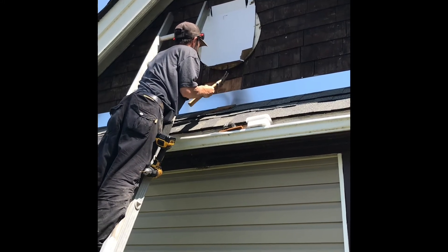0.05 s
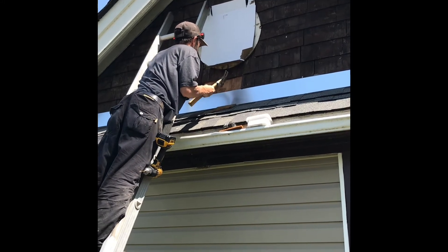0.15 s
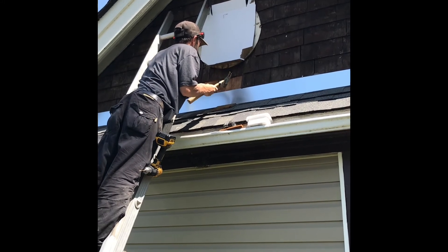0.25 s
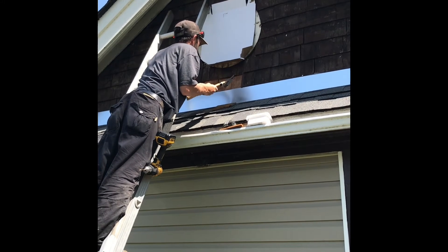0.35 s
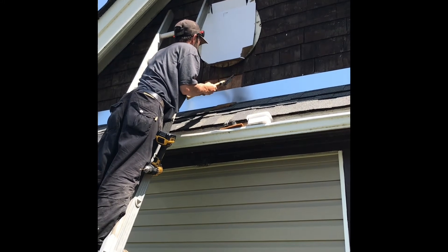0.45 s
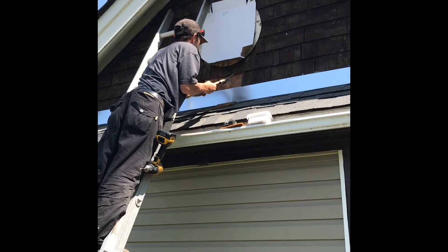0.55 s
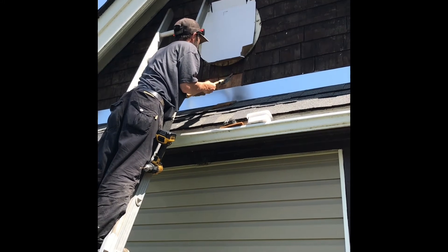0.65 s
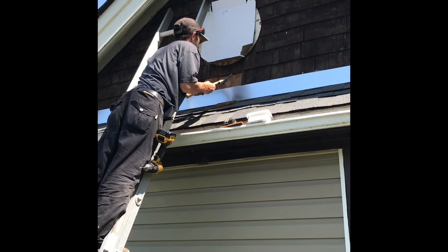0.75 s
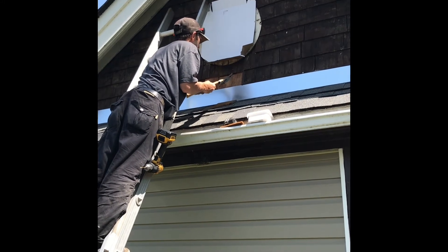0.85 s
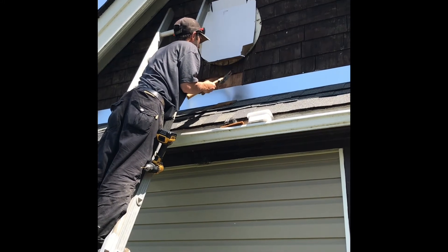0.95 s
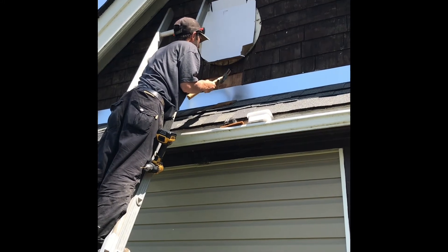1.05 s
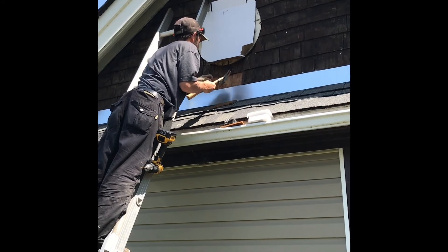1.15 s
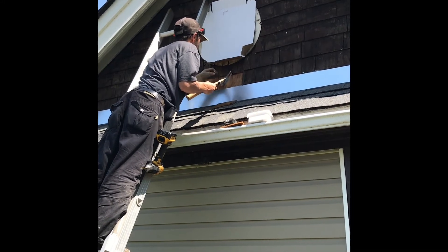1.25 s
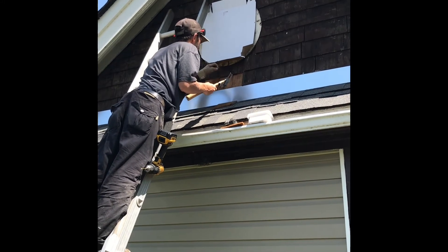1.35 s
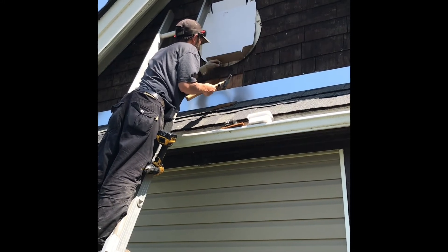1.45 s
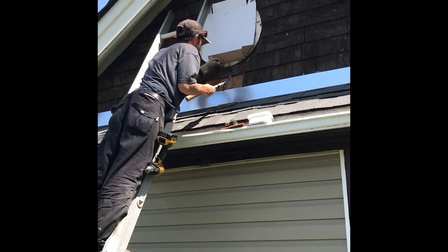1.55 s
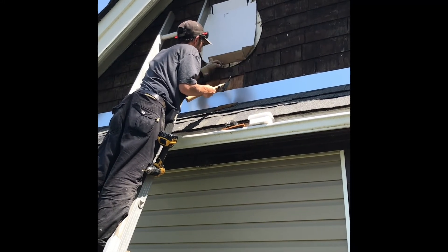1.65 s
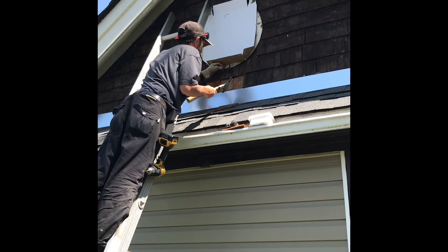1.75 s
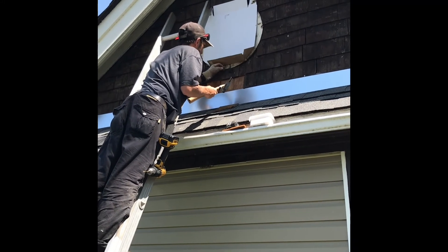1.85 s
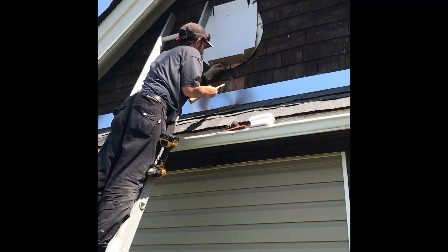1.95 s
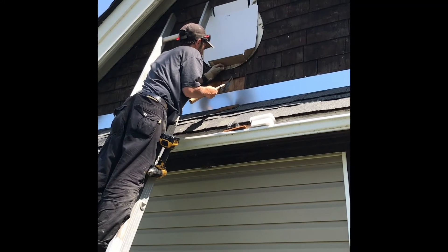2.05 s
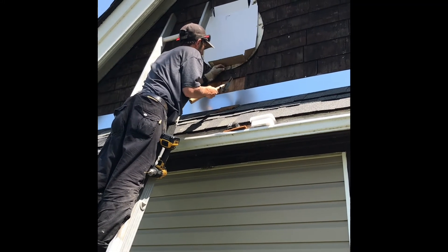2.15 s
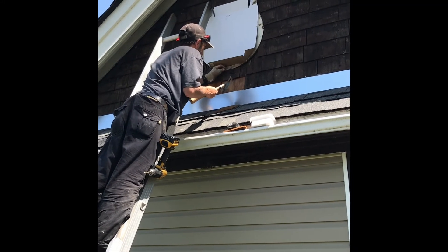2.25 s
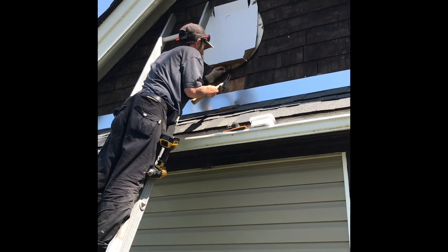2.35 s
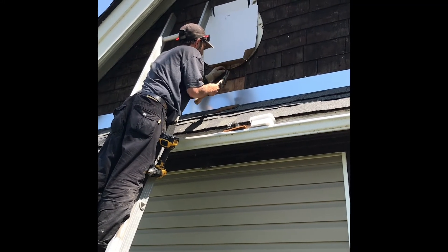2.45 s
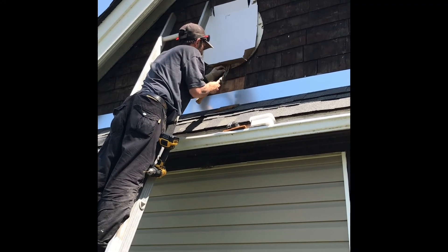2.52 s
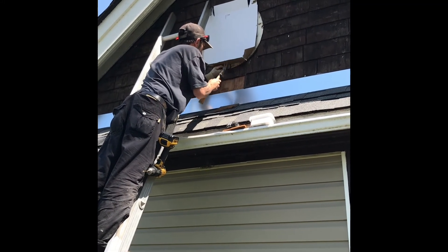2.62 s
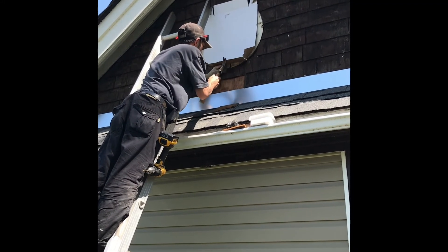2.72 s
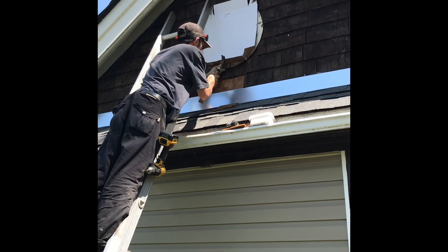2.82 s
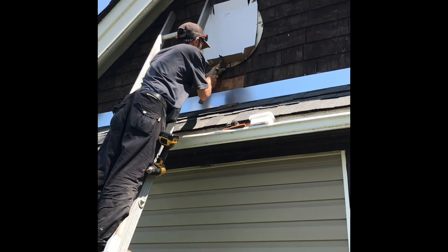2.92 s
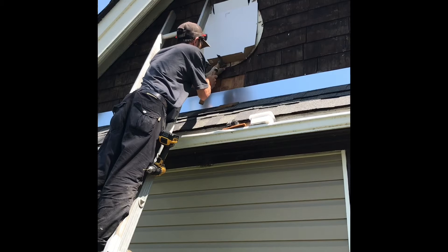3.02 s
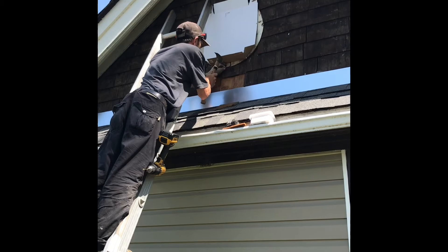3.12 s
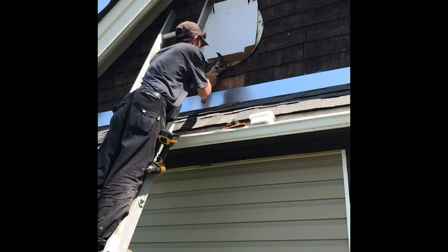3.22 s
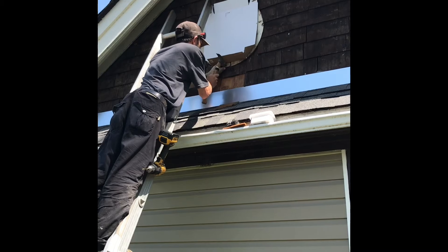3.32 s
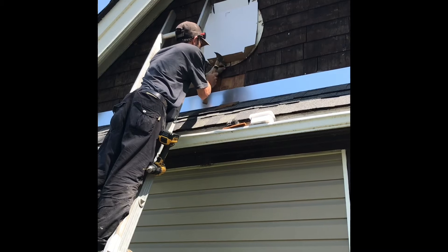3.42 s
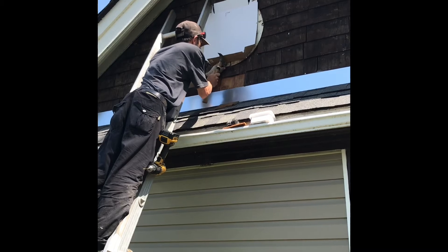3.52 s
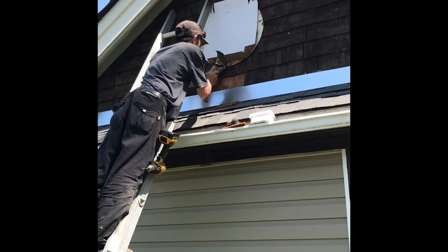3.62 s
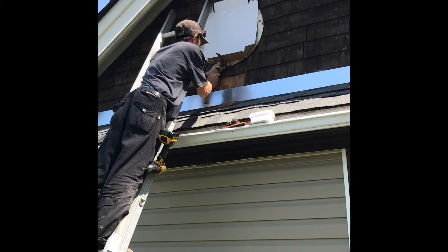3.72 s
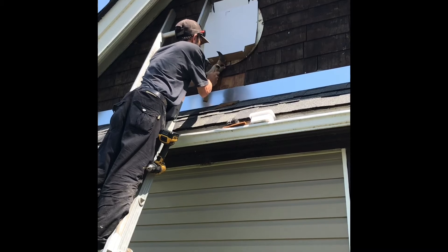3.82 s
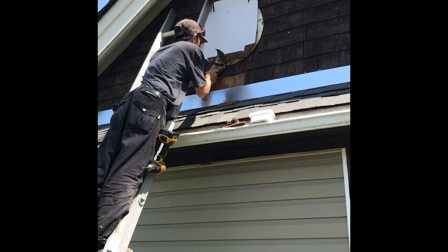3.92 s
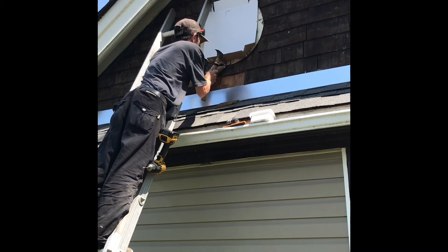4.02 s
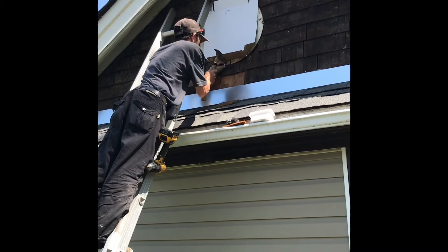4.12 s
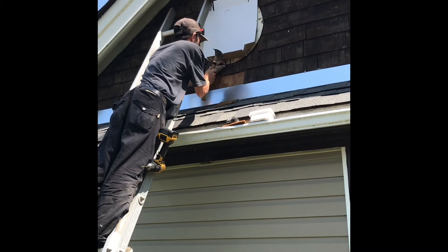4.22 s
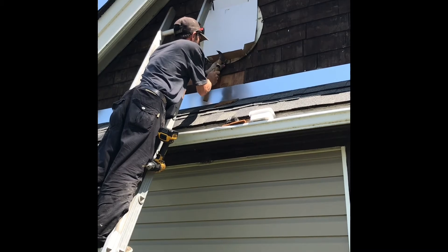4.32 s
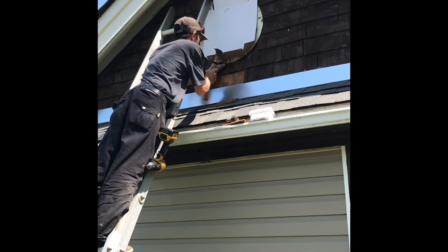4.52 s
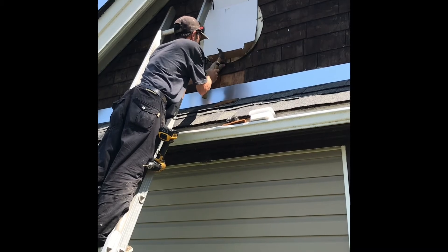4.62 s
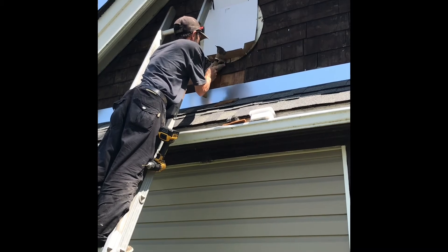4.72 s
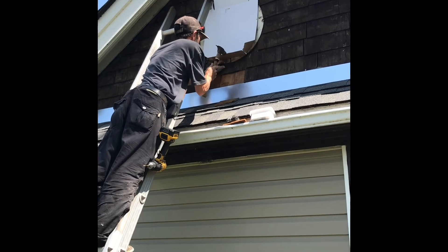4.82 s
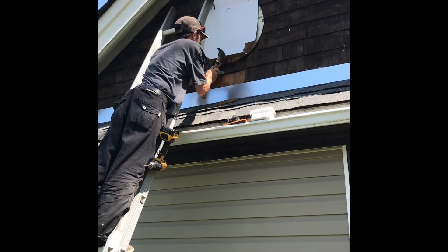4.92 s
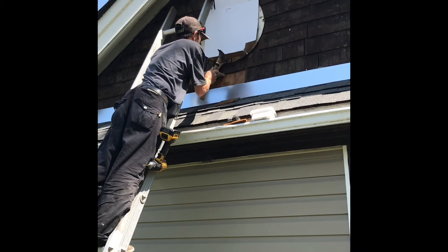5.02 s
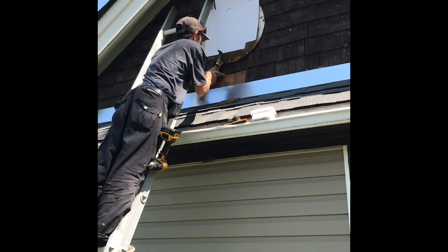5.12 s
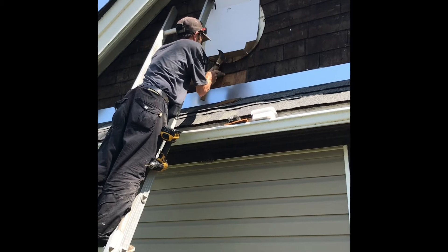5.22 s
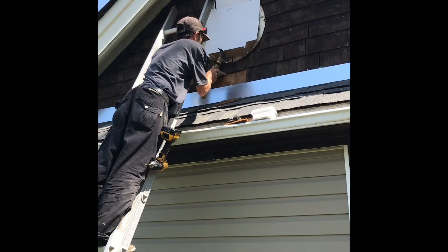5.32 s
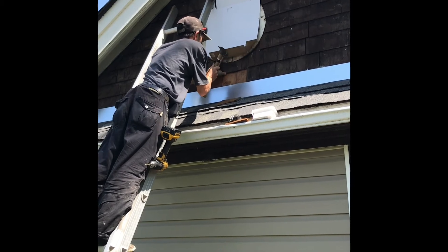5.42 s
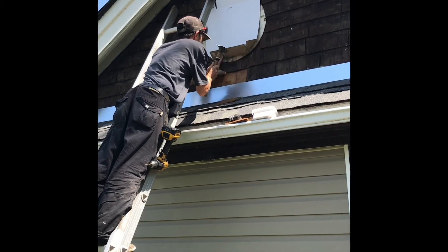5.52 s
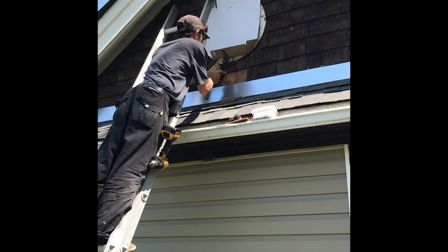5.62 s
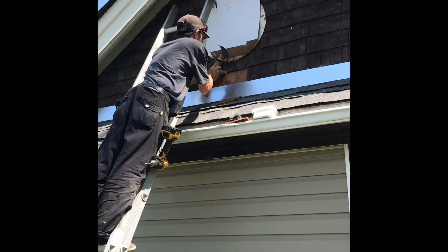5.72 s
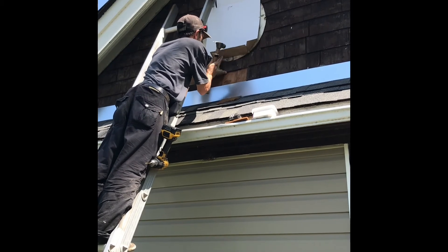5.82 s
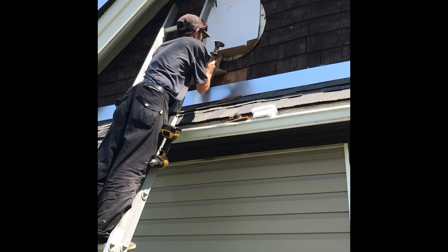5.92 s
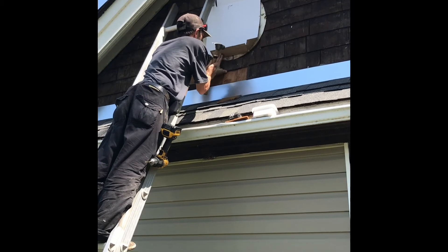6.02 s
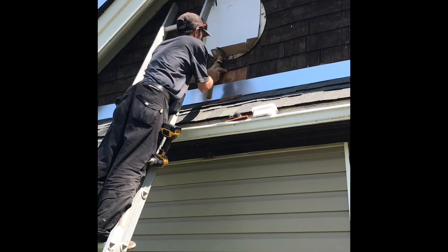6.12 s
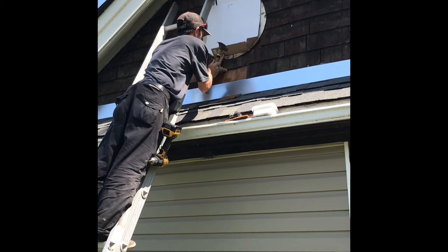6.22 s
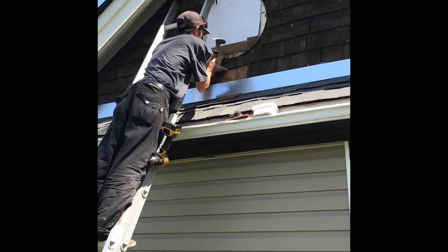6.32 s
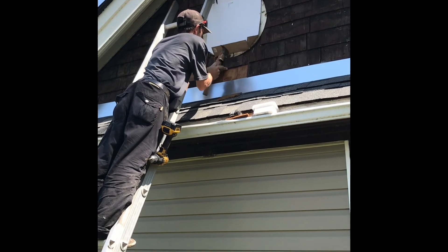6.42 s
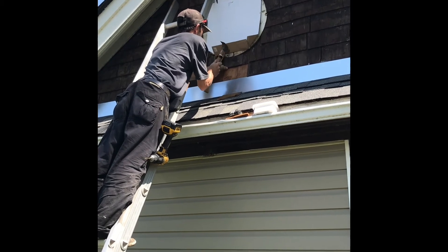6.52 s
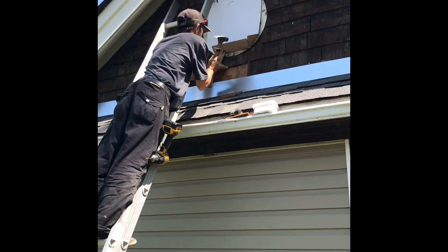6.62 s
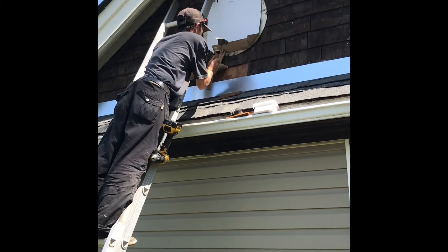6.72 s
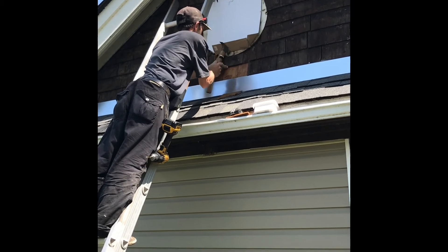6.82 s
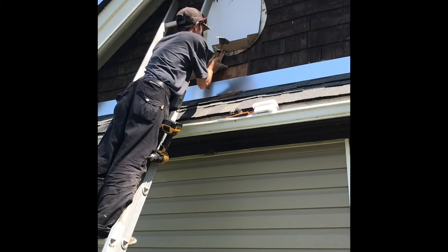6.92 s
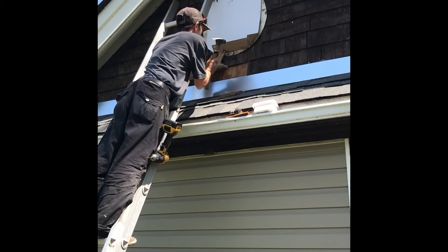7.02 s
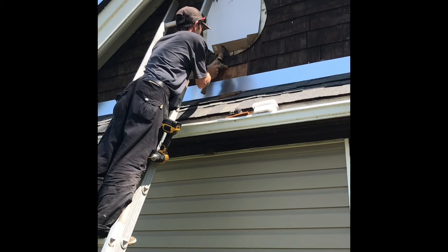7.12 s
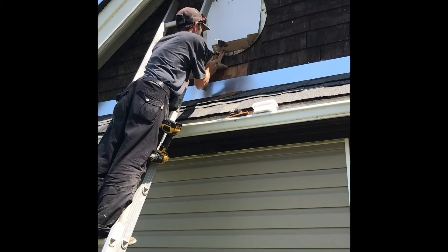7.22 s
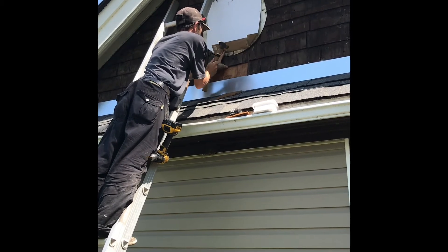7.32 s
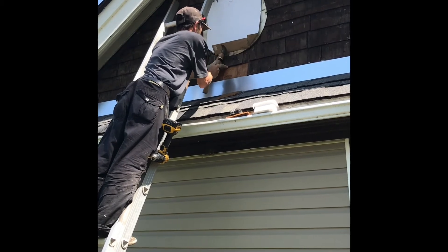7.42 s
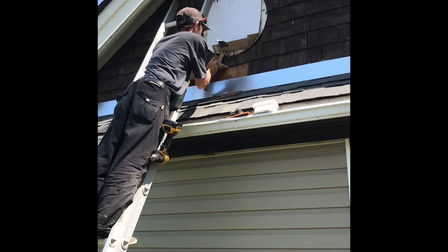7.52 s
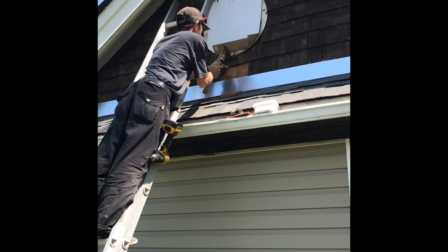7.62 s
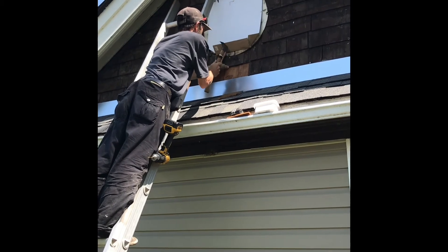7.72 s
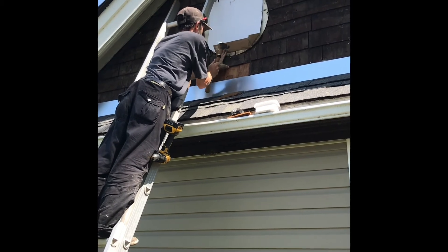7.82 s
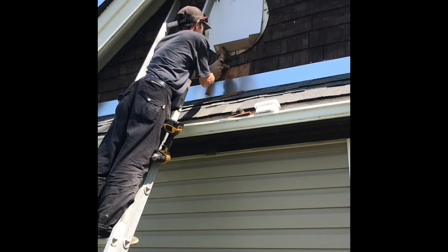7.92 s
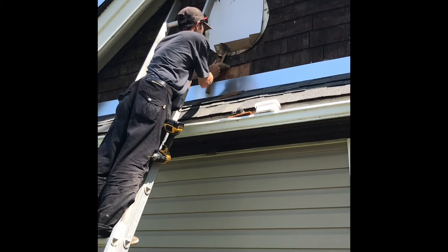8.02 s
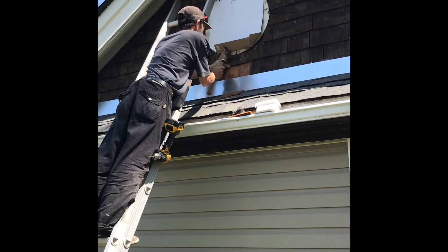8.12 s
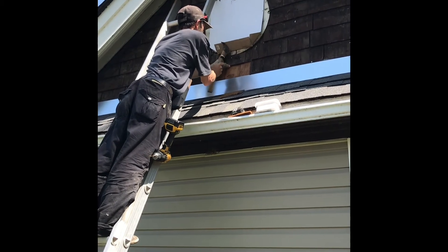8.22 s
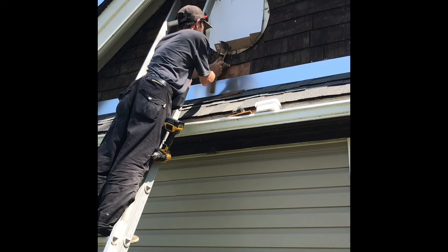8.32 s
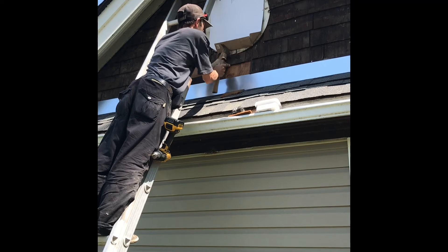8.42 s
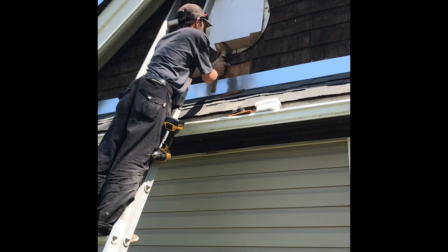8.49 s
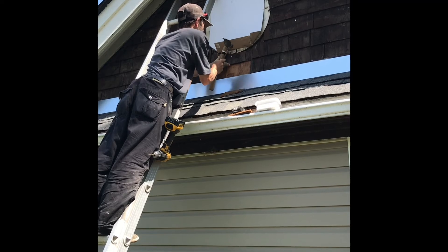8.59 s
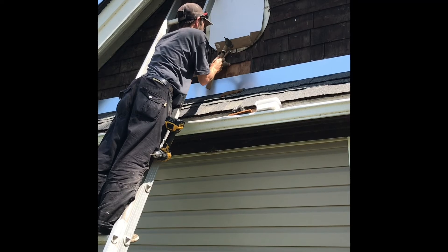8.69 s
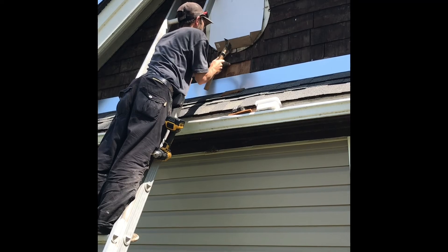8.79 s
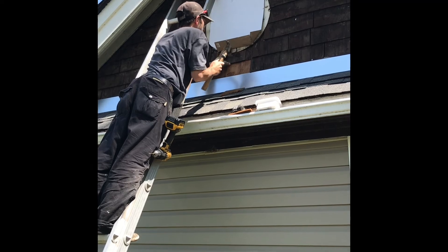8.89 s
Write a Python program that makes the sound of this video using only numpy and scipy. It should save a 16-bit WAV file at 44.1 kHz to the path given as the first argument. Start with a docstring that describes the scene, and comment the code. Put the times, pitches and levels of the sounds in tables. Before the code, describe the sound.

Outdoors by a wooden house, captured by a phone some metres away. From 0 to 3.3 s there is only low, wavering distant traffic with faint hiss, a weak far motor hum, and little sleeve rustles, clearest around 1.5 s. At 3.3 s a very light hammer tap, a firmer one at 3.55, then a full blow at 3.77 with a tiny rebound. Two more strong blows land at 4.35 and 4.6. Each is a sharp steel crack, a woody knock and a short hollow-wall thud, with a faint wash and echoes. A gap holds soft bumps and cloth rustle around 4.95 and 5.5. Blows resume at 5.7 and 6.15, then come about every 0.25 to 0.35 s until 8.4. High steel ringing stands out at 6.5 and 7.95; strokes around 7.1 to 7.7 knock lower and less thuddy. The motor hum grows slightly; the last blow fades into traffic.

```python
"""In the yard of a wooden house, a worker on a ladder hammers nails through metal flashing into the wall,
some metres from a phone. Each blow excites damped modes: a steel crack, a knock of the boards and a late thud
of the hollow wall; the steel rings on, more strongly after some blows. Noise with decaying energy makes the
wash of the yard, a faint smeared bounce of the hammer and two echoes. Filtered noise makes the sleeve's
rustle and the rumble of distant traffic; a wavering sine makes the hum of a far motor."""
import sys
import numpy as np
from scipy import signal
from scipy.fft import rfft, irfft
from scipy.io import wavfile
from scipy.ndimage import uniform_filter1d

SR = 44100
rng = np.random.default_rng(int(sys.argv[2]) if len(sys.argv) > 2 else 0)


def store_wav(level_fs):
    """Save 16-bit WAV to argv[1]."""
    pcm = np.round(np.clip(np.atleast_2d(level_fs), -1, 1) * 32767)
    wavfile.write(sys.argv[1], SR, pcm.T.astype(np.int16))


N = 394689
AGE = np.arange(SR // 2) / SR  # time since a blow [s]

# hammer blows: (time [s], strength [dB], board resonance [Hz], brightness [dB], steel ring [dB re strength])
BLOWS = [(3.339,-44.5,1000,5,-28), (3.5524,-31,1040,0.5,-34), (3.771,-24,1105,0.5,-28),
         (4.3428,-23,1134,3.5,-26.5), (4.615,-22.5,1176,4.5,-20), (5.6705,-22.7,1186,4,-17.5),
         (6.1621,-22,1256,4.5,-15), (6.4888,-22,1247,4.5,-7.5), (6.8323,-22,1237,5,-14),
         (7.142,-21.7,1043,6.5,-22), (7.42,-22,950,6.5,-18), (7.6797,-24,910,4,-20),
         (7.9357,-24,943,0,-6.5), (8.1826,-23,1070,-0.5,-24), (8.4254,-21,1140,-0.5,-16.5)]
# the hammer drops back on the nail: (time [s], strength [dB])
REBOUNDS = [(3.832,-44), (7.4564,-45), (8.4825,-39)]
# soft bumps against the wall: (time [s], thud level [dB])
BUMPS = [(4.952,-44.5), (5.75,-40)]
# modes of the struck nail: two lower ones ring on freely, most others die at once:
# (frequency [Hz], level [dB], t60 [s])
NAIL_MODES = [(3400, -20, .05), (4110, -15.5, 0.045), (5680, 2.5, 0.006), (6300, -5, 0.0055),
              (8810, -13.5, 0.021), (9630, -9.5, 0.0066), (11100, -6.5, 0.0026), (14800, -21.5, 0.0045)]
# modes of the boards and flashing: (frequency [Hz], level [dB], t60 [s])
BOARD_MODES = [(597, -12.5, 0.15), (685.5, -8, 0.097), (790, -1, .07), (897, 0.5, 0.051), (998, -8.5, .07),
               (1098, -5, 0.066), (1228, 1.5, 0.034), (1308, 1, 0.036), (1416, 0.5, 0.043),
               (1690, -23, 0.11), (1780, -23.5, 0.053), (2225, -1, 0.038), (2220, -13.5, 0.09)]
# modes of the hollow wall: (frequency [Hz], level [dB], t60 [s])
WALL_MODES = [(51.4, -12.5, 0.072), (87, -28.5, 0.2), (111, -3, 0.051), (183.2, 0.5, 0.063),
              (214.8, -23, 0.094), (254.8, 1.2, 0.04), (361.5, -10.5, 0.055), (439, -21.5, 0.086)]
# free ring of the hammer head, lower and upper modes: (frequency [Hz], level [dB], t60 [s])
HEAD_LOWER_MODES = [(4883, -2, .18), (5114, -12, .15)]
HEAD_UPPER_MODES = [(5658, -9, .19), (5749, -4, .24)]
# spectrum of the bright spray of the first instant: (frequency [Hz], level [dB])
CRACK_SPRAY = [(2000, -20), (3500, -7.5), (5600, 2.5), (7400, -6), (9800, -9.5), (13000, -12.5),
               (16000, -16)]
# spectra of the scatter after crack and knock: (frequency [Hz], level [dB])
CRACK_SCATTER = [(1800, -20.5), (2700, 5.5), (4200, 3), (5700, 0.5), (7300, -4), (9300, -7.5), (12000, -19),
                 (16000, -22.5)]
KNOCK_SCATTER = [(250, -8), (500, -9.5), (900, 4.5), (1300, 4), (1700, 8), (2400, 4), (3300, -31)]
# what the yard returns of each part of a blow, summed over all directions: (frequency [Hz], level [dB])
YARD_THUD = [(40, -16.5), (100, 3), (190, 1), (330, -7.5), (520, -13.5), (900, -38)]
YARD_KNOCK = [(300, -26), (600, -5), (900, 5), (1250, 6), (1650, -1), (2300, -3.5), (3500, -44.5)]
YARD_CRACK = [(1500, -17), (2700, 0), (4200, -1), (5700, -4.5), (7400, -9), (9300, -9.5), (11000, -22),
              (16000, -20.5)]
# late returns of a blow: a faint smeared bounce of the hammer, then two echoes:
# (delay [s], level [dB], t60 [s])
LATE_RETURNS = [(.066, -33.5, .2), (0.19, -35, .22), (.338, -44.5, .16)]
# sleeve rustles: (centre time [s], length [s], peak level [dB])
RUSTLES = [(1.46, 0.068, -64), (1.553, 0.15, -54.5), (1.74, 0.2, -60.5), (2.37, 0.087, -66),
           (2.9, 0.077, -65), (4.942, 0.16, -59.5), (5.491, 0.13, -57), (6.013, .07, -60)]
# spectrum of rubbing cloth: (frequency [Hz], level [dB])
CLOTH_SPECTRUM = [(800, -32), (2500, 7), (4200, -3), (5300, 1.5), (7000, -1), (9000, -2), (15000, -3.5)]
# spectrum of the traffic wash: (frequency [Hz], level [dB])
TRAFFIC_SPECTRUM = [(15, -17.5), (25, -11.5), (50, -2), (92, -1), (200, -12.5), (249, -21), (309, -15),
                    (476, -25), (796, -24), (1070, -21), (1290, -26), (1700, -28), (1890, -32.5),
                    (12900, -56.5), (16000, -54.5)]
# narrow bands in the distant drone: (frequency [Hz], width [Hz], level before wavering [dB])
DRONE_BANDS = [(90, 40, -60.5), (375, 40, -67), (1052, 41, -67.5), (1743, 20, -69), (3190, 1100, -73.5)]

# the firmer the nail sits, the higher the board rings and the more of the blow goes into the wood
SEAT_HZ = 1100
KNOCK_DB, KNOCK_DB_PER_OCTAVE = 2, 7  # re strength, at SEAT_HZ
THUD_DB, THUD_DB_PER_OCTAVE = 0.34, 20.5  # re strength, at SEAT_HZ and FULL_BLOW_DB
# light blows press longer on the nail and leave more of their force to the wall
FULL_BLOW_DB, SOFT_THUD_DB_PER_DB = -22, 0.3745
REBOUND_HZ, REBOUND_BRIGHT_DB = 1620, 1.5
REBOUND_KNOCK_DB, REBOUND_THUD_DB = 4.5, 4.5  # re strength
BUMP_HZ, BUMP_KNOCK_DB = 705, -8.5  # knock re thud
# bright, glancing blows wake the lower ring of the head
GLANCE_RING_DB, GLANCE_DB_PER_DB = -35, 4  # re strength; growth with brightness
SQUARE_RING_DB = -28.5  # lower ring of a square blow, re strength
# the motor idles, then grows steadily louder
MOTOR_DB, MOTOR_GROWS_S, MOTOR_DB_PER_S = -65.5, 4, 3.0


def hammering():
    """Superposition: the direct sounds of all contacts, head rings and bumps add at the microphone."""
    out = np.zeros(N)
    for s, thud_db, knock_db, crack_db, board_hz, bright_db in contacts():
        add(out, s, crack(crack_db, bright_db))
        # the wood answers a moment after the steel
        add(out, s + 0.00033, knock(knock_db, board_hz) + thud(thud_db))
    for s, db, _, bright_db, ring_db in BLOWS:
        add(out, s, head_ring(db, bright_db, ring_db))
    for s, db in BUMPS:
        add(out, s, knock(db + BUMP_KNOCK_DB, BUMP_HZ) + thud(db))
    return out


def contacts():
    """Division of impact energy: (time [s], thud, knock, crack [dB], board [Hz], brightness [dB])."""
    rows = []
    for s, db, hz, bright_db, _ in BLOWS:
        seat = np.log2(hz / SEAT_HZ)  # octaves
        softness_db = FULL_BLOW_DB - db
        thud_db = db + THUD_DB + THUD_DB_PER_OCTAVE * seat + SOFT_THUD_DB_PER_DB * softness_db
        knock_db = db + KNOCK_DB + KNOCK_DB_PER_OCTAVE * seat
        rows.append((s, thud_db, knock_db, db, hz, bright_db))
    for s, db in REBOUNDS:
        rows.append((s, db + REBOUND_THUD_DB, db + REBOUND_KNOCK_DB, db, REBOUND_HZ, REBOUND_BRIGHT_DB))
    return rows


def crack(db, tilt_db):
    """Impact of stiff bodies: steel meets the nail and wakes its modes, then scatter off wall and eaves."""
    direct = blow_level(ring(NAIL_MODES, detune=.01, uneven_db=1.5, spread_s=.00005), 0)
    spray = blow_level(scatter(CRACK_SPRAY, t60=0.0099), -3)
    reflections = blow_level(scatter(CRACK_SCATTER, t60=0.074), -3.3)
    # brightness tilts the spectrum between 6 and 10 kHz
    tilted = colour(direct + spray + reflections, [(6000, 0.027), (10000, tilt_db)])
    return blow_level(tilted, db)


def knock(db, board_hz):
    """Local resonance: boards ring, most under the nail, at a pitch that shifts as the nail sinks in."""
    boards = blow_level(ring(BOARD_MODES, detune=.004, uneven_db=1.2, spread_s=.0005), 0)
    reflections = blow_level(scatter(KNOCK_SCATTER, t60=0.066), -2)
    spot = blow_level(resonance(boards, board_hz, 170), 0)
    return blow_level(highpass(boards + reflections + spot, 470), db)


def thud(db, swell_s=0.016):
    """Inertia of a hollow wall: motion builds over a few cycles; neighbouring modes have opposite senses."""
    hz, mode_db, t60 = np.transpose(WALL_MODES)[:, :, None]
    sense = (-1) ** np.arange(len(WALL_MODES))[:, None]
    size = sense * undb(mode_db + 1.8 * rng.standard_normal(hz.shape))
    modes = size * fade(AGE, t60) * np.cos(2 * np.pi * hz * AGE)
    swell = 1 - np.exp(-AGE / swell_s)
    return blow_level(np.sum(modes, axis=0) * swell, db)


def head_ring(db, bright_db, ring_db):
    """Free vibration: the hammer head rings on, its lower modes more after bright, glancing blows."""
    lower_db = max(SQUARE_RING_DB, GLANCE_RING_DB + GLANCE_DB_PER_DB * bright_db)
    lower = undb(db + lower_db) * ring(HEAD_LOWER_MODES)
    upper = undb(db + ring_db) * ring(HEAD_UPPER_MODES)
    return lower + upper


def surroundings():
    """Frequency-dependent decay: thud, knock and crack each die away in the yard at their own pace."""
    _, thud_db, knock_db, crack_db = np.transpose(contacts())[:4]
    lows = yard(thud_db, YARD_THUD, near_db=-13.0, near_t60=0.18, far_db=-27.5, far_t60=2.2)
    mids = yard(knock_db, YARD_KNOCK, near_db=-23.0, near_t60=0.29, far_db=-27, far_t60=3.0)
    highs = yard(crack_db, YARD_CRACK, near_db=-26.5, near_t60=0.5, far_db=-33.5, far_t60=1.6)
    grain = undb(1.8 * walk(170))  # single reflections make the wash grainy
    return lows + (mids + highs) * grain


def yard(levels_db, spectrum, near_db, near_t60, far_db, far_t60):
    """Addition of energies: a short wash and a thin long tail of open air, with the smeared late returns."""
    t = np.arange(2 * SR) / SR
    response = np.zeros(len(t))
    wash, tail = (.012, near_db, near_t60), (.15, far_db, far_t60)
    for delay, db, t60 in [wash, tail] + LATE_RETURNS:
        envelope = fade(t, t60) * (1 - np.exp(-t / 0.0053))
        add(response, delay, blow_level(envelope, db) ** 2)
    power = np.zeros(N)
    for contact, db in zip(contacts(), levels_db):
        add(power, contact[0], undb(db) ** 2 * response)
    return np.sqrt(power) * level(colour(rng.standard_normal(N), spectrum), 0)


def sleeve():
    """Friction noise: cloth slides in short, grainy strokes."""
    strokes = np.zeros(N)
    for s, length, db in RUSTLES:
        add(strokes, s - length / 2, undb(db) * np.hanning(int(length * SR)))
    cloth = colour(rng.standard_normal(N), CLOTH_SPECTRUM)
    grain = undb(2.0 * walk(150))
    return strokes * level(cloth * grain, 0)


def motor(hz=195):
    """Frequency modulation: a far motor hums on one wavering note, idles, then slowly grows."""
    growth_s = np.maximum(np.arange(N) / SR - MOTOR_GROWS_S, 0)
    db = MOTOR_DB + MOTOR_DB_PER_S * growth_s
    phase = 2 * np.pi * np.cumsum(hz * (1 + 0.014 * walk(7.0))) / SR
    return level(np.sin(phase), 0) * undb(db + 2 * walk(6.4))


def traffic():
    """Incoherent sources: far roads merge into a wavering rumble under smooth hiss, with droning bands."""
    wash = level(colour(rng.standard_normal(N), TRAFFIC_SPECTRUM), -45.2)
    rumble = resonance(wash, 100, 140)
    rumble_change = rumble * (undb(1.0 * walk(8.3)) - 1)
    drone = np.zeros(N)
    for hz, width_hz, db in DRONE_BANDS:
        band = level(resonance(rng.standard_normal(N), hz, width_hz), db)
        drone += band * undb(1.0 * walk(1.8))
    return (wash + rumble_change + drone) * undb(0.35 * walk(0.34))


def ring(modes, detune=0, uneven_db=0, spread_s=0):
    """Modal superposition: damped sines, varied by chance, that start up to spread_s apart."""
    hz, db, t60 = np.transpose(modes)[:, :, None]
    pitch, size = rng.standard_normal((2, len(modes), 1))
    t = np.maximum(AGE - spread_s * rng.random((len(modes), 1)), 0)
    swing = np.sin(2 * np.pi * hz * (1 + detune * pitch) * t)
    return np.sum(undb(db + uneven_db * size) * fade(t, t60) * swing, axis=0)


def scatter(points, t60):
    """Diffuse decay: countless dense modes and near reflections as coloured noise that dies away."""
    return colour(rng.standard_normal(len(AGE)) * fade(AGE, t60), points)


def resonance(x, hz, width_hz):
    """Simple resonator: two-pole band-pass, gain 1 at the centre."""
    return signal.lfilter(*signal.iirpeak(hz, hz / width_hz, fs=SR), x)


def colour(x, points):
    """Minimum phase: causal filter with the given (frequency [Hz], level [dB]) spectrum, from its cepstrum."""
    size = 8192
    hz, db = np.transpose(points)
    bins = np.maximum(np.fft.rfftfreq(size, 1 / SR), 1)
    gain = undb(np.interp(np.log(bins), np.log(hz), db))
    cepstrum = irfft(np.log(gain))
    # fold the negative times onto the positive ones
    cepstrum[1:size // 2] *= 2
    cepstrum[size // 2 + 1:] = 0
    impulse = irfft(np.exp(rfft(cepstrum)))
    return signal.fftconvolve(x, impulse)[:len(x)]


def highpass(x, hz):
    """Low-frequency attenuation: fourth-order cut below hz."""
    return signal.sosfilt(signal.butter(4, hz, "high", fs=SR, output="sos"), x)


def walk(rate):
    """Slow random modulation: straight glides between chance values, rate per second, spread near 0.8."""
    k = int(SR / rate)
    steps = np.repeat(rng.standard_normal(N // k + 1), k)
    return uniform_filter1d(steps, k)[:N]


def fade(t, t60):
    """Exponential decay: 60 dB down after t60."""
    return np.exp(-np.log(1000) * t / t60)


def undb(db):
    """Logarithmic level: decibels to amplitude gain."""
    return 10 ** (np.asarray(db) / 20)


def level(x, db):
    """Mean power: set the rms level of a steady sound."""
    return x * undb(db) / np.sqrt(np.mean(x ** 2))


def blow_level(x, db):
    """Impulse energy: set a blow's level as its energy spread over a twentieth of a second."""
    return x * undb(db) / np.sqrt(np.sum(x ** 2) / (SR / 20))


def add(out, s, x):
    """Linear superposition: mix x into out from time s."""
    i = max(int(round(s * SR)), 0)
    out[i:i + len(x)] += x[:max(len(out) - i, 0)]


def scene():
    """Superposition at one microphone: hammer and house, yard, sleeve, motor and traffic."""
    return (hammering() + surroundings() + sleeve() + motor() + traffic())[None]


def record(dry):
    """Limited bandwidth and range: the phone drops the deepest bass, rounds the highest peaks, cuts the top."""
    x = highpass(highpass(dry, 29), 30)
    rounded = x / (1 + (x / 1.05) ** 6) ** (1 / 6)
    return signal.sosfilt(signal.ellip(8, .2, 80, 15800, fs=SR, output="sos"), rounded)


dry = scene()
out = record(dry)
store_wav(out)
```